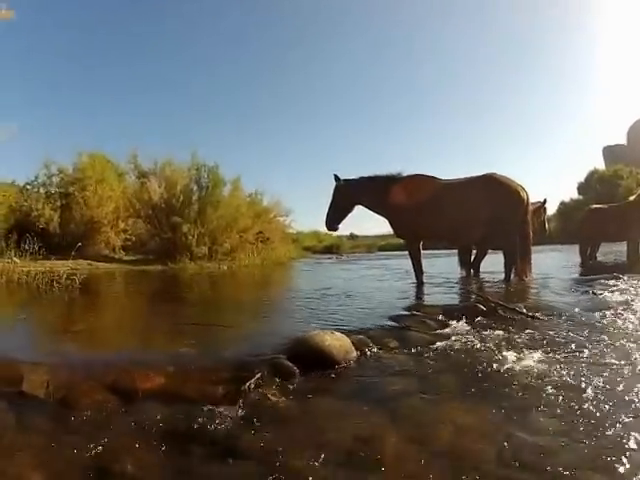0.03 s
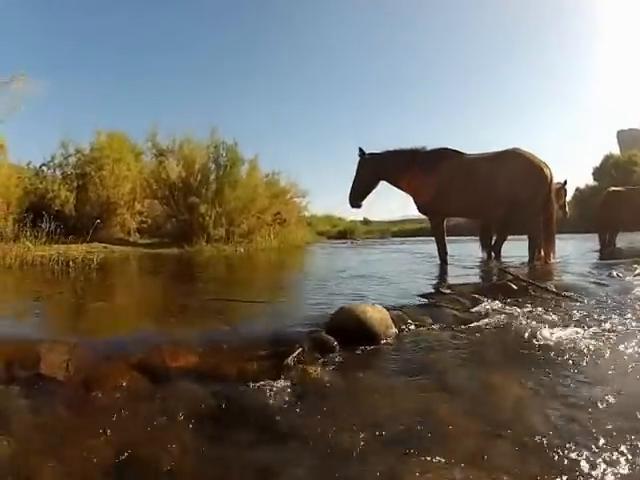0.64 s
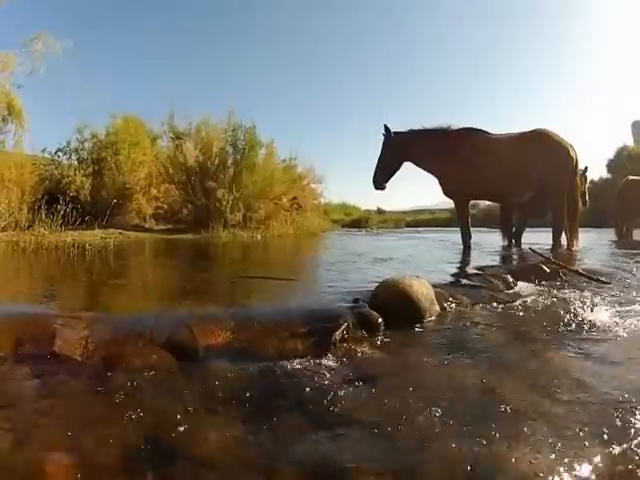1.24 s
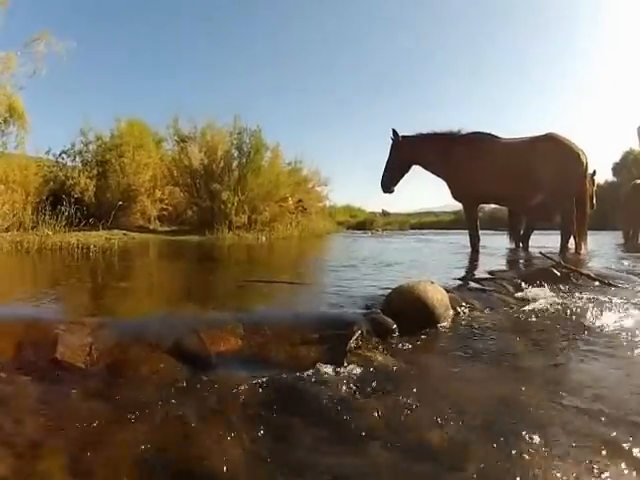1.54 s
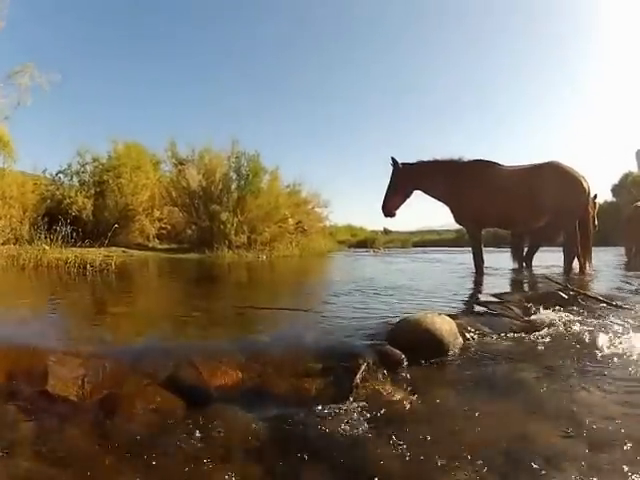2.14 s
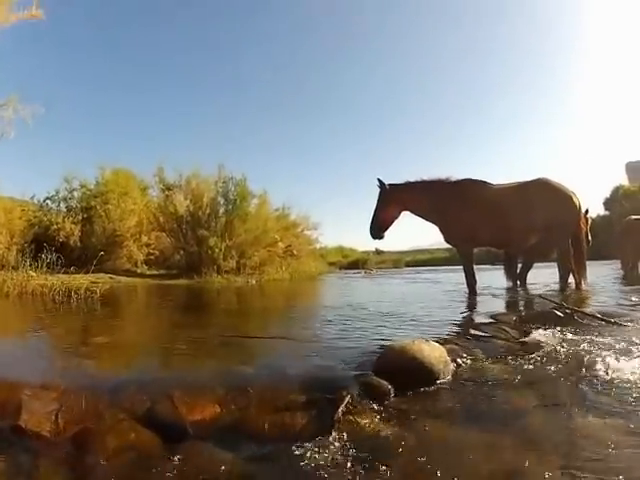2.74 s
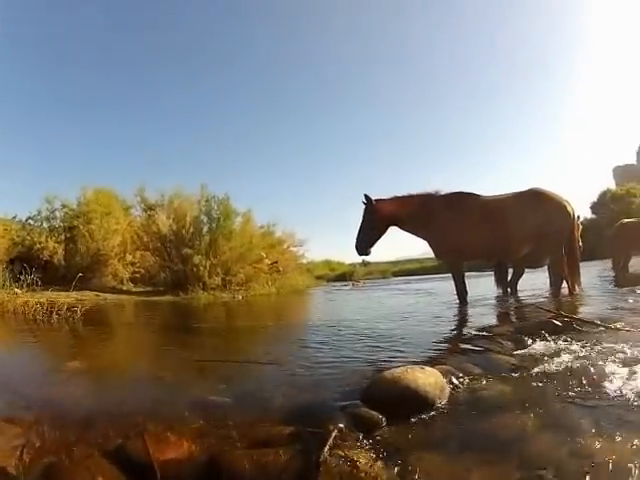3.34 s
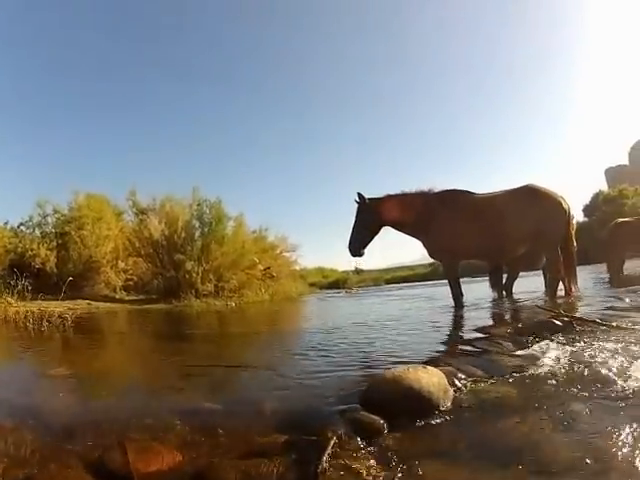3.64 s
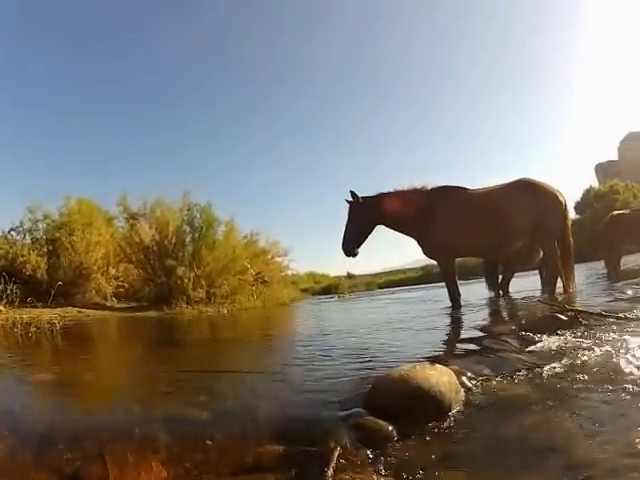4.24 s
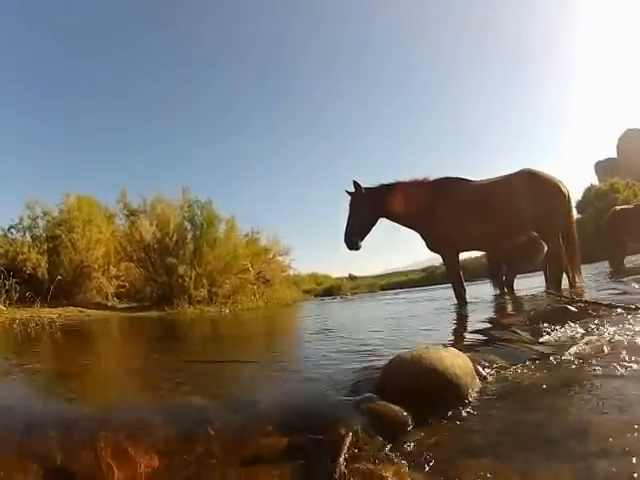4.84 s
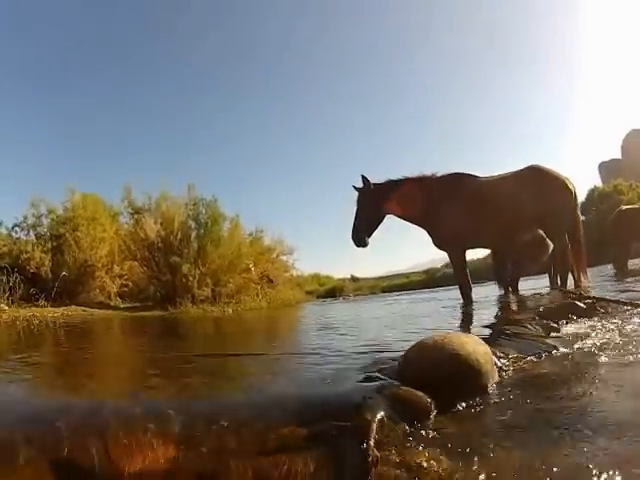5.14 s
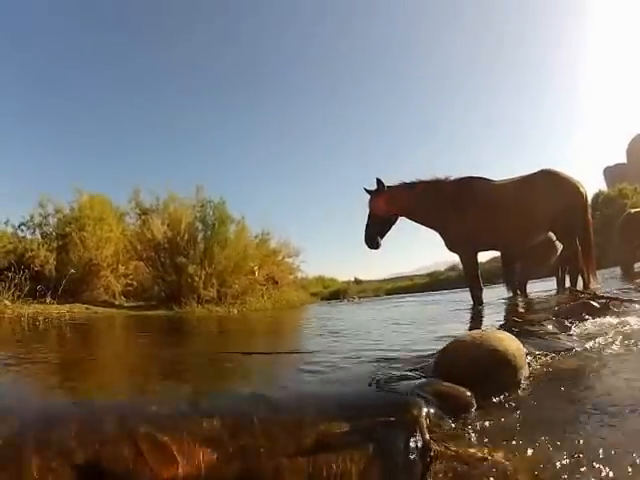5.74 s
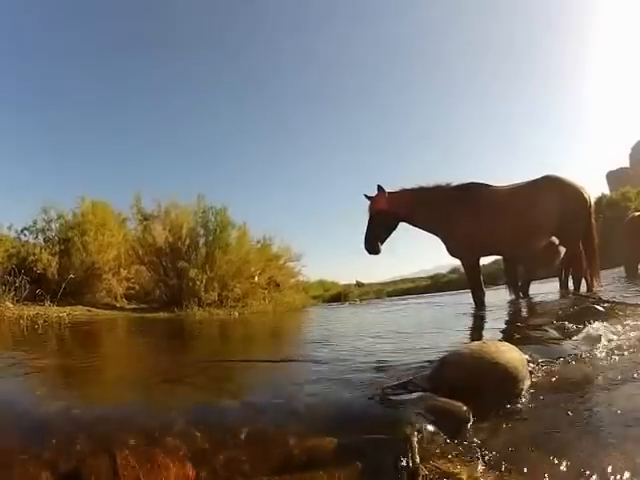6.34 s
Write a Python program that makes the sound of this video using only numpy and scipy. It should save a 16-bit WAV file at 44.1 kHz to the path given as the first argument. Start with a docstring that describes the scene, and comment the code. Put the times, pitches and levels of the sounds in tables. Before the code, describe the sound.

At a shallow river's edge, water laps irregularly against a half-submerged microphone housing, giving hollow thumps, brief splashy washes, plinks and ticking drops. After a short lull past the middle, deep glugs and gurgles lead into gentler lapping. Shallow water trickles faintly over stones throughout. The sound is very close and somewhat muffled by the case, with a thin metallic edge.

```python
"""Wavelets slap a waterproof camera case, half sunk at the edge of a shallow river.
Every push rings the same hollow case modes; water sluices over it and gurgles under it.
Trapped air rings as bubbles, drops tick nearby, and a riffle runs over stones behind.
The camera samples at a low rate and holds each sample, adding a thin metallic sheen."""
import sys
import numpy as np
from scipy import signal
from scipy.fft import rfft, irfft
from scipy.io import wavfile
from scipy.ndimage import uniform_filter1d

SR = 44100
rng = np.random.default_rng(int(sys.argv[2]) if len(sys.argv) > 2 else 0)


def master_out(mix):
    """Clip the mix to full scale and print it as 16-bit PCM to the path in sys.argv[1]."""
    frames = np.transpose(np.atleast_2d(mix))
    ceiling = np.clip(frames, -1, 1)
    pcm = np.round(ceiling * 32767).astype(np.int16)
    wavfile.write(sys.argv[1], SR, pcm)


N = 290178
TIME = np.arange(N) / SR


def undb(db):
    """Decibels to gain."""
    return 10 ** (np.asarray(db) / 20)


def add(track, start_s, sound):
    """Mix a sound into the track at start_s."""
    i = int(np.clip(start_s * SR, 0, N - 1))
    track[i:i + len(sound)] += sound[:N - i]


def through(x, response):
    """Convolve with an impulse response."""
    return signal.fftconvolve(x, response)[:N]


def colour(points, size=4096):
    """Minimum-phase impulse response from (f/Hz, level/dB) points."""
    hz, db = np.transpose(points)
    grid_hz = np.maximum(np.arange(size // 2 + 1) * SR / size, 1)
    gain = undb(np.interp(np.log(grid_hz), np.log(hz), db))
    cepstrum = irfft(np.log(gain))
    cepstrum[1:size // 2] *= 2
    cepstrum[size // 2 + 1:] = 0
    return irfft(np.exp(rfft(cepstrum)))


def wander(rate_hz):
    """Random steps, smoothed twice; unit spread."""
    hold = max(int(SR / rate_hz), 2)
    steps = np.repeat(rng.standard_normal(N // hold + 1), hold)
    smooth = uniform_filter1d(uniform_filter1d(steps, hold), hold)[:N]
    return smooth / smooth.std()


def patter(rate_per_s, spread_db):
    """Tiny impacts at random times, a few much larger; unit rms."""
    size = undb(spread_db * np.minimum(rng.exponential(size=N), 5))
    hits = (rng.random(N) < rate_per_s / SR) * size * rng.choice([-1, 1], N)
    return hits / hits.std()


def surges(table, swell_s=0.016, drain_s=0.019):
    """Envelope of water surges: swell, hold, drain."""
    envelope = np.zeros(N)
    for start_s, length_s, db in table:
        swell = np.clip((TIME - start_s) / swell_s, 0, 1)
        drain = np.exp(-np.maximum(TIME - start_s - length_s, 0) / drain_s)
        envelope += undb(db) * swell * drain
    return envelope


# modes of the half-sunk case: f/Hz, level/dB, t60/s
CASE_MODES = [(38, -24, 0.3), (59, -13.5, 0.12), (119, -23.5, 0.14), (166.8, -13.5, 0.17),
              (229, -21.5, 0.024), (293.6, -20.5, 0.091), (484, -28.5, 0.029), (565, -33, 0.048),
              (612, -20.5, 0.042), (704, -32.5, 0.09), (779, -38.5, 0.13), (836.8, -20, 0.049),
              (977, -33, 0.057), (1094, -27, 0.019), (1440, -23.5, 0.01), (1674, -17.5, 0.0083),
              (2057, -26, 0.0067), (2067, -28.5, 0.02), (2367, -36, 0.058), (3723, -22.5, 0.012),
              (4090, -31.5, 0.038)]


def case(push, band_hz=(33.3, 2570), lag_s=0.00099, lag_corner_hz=260):
    """Every push rings the same modes; the walls cut the deepest sway and the treble."""
    t = TIME[:SR // 2]
    ring = sum(undb(db) * np.exp(-np.log(1000) * t / t60_s) * np.sin(2 * np.pi * hz * t)
               for hz, db, t60_s in CASE_MODES)
    walls = signal.butter(4, band_hz, "band", fs=SR, output="sos")
    ring = signal.sosfilt(walls, ring)
    # low bending waves travel slower and smear the blow
    grid_hz = np.arange(SR // 2 + 1)
    travel_s = lag_s * np.sqrt(1000 / (grid_hz + lag_corner_hz))
    smear = np.exp(-2j * np.pi * np.cumsum(np.maximum(travel_s - lag_s / 2, 0)))
    return through(push, irfft(rfft(ring, SR) * smear))


# water sheets over the case: t/s, length/s, level/dB
SHEETS = [(0, 0.012, -45.5), (.11, 0.027, -59), (0.6, 0.043, -48), (0.85, 0.17, -51.5), (1.052, 0.22, -39),
          (1.185, 0.038, -41), (1.45, 0.15, -37), (2.02, 0.105, -46), (2.235, 0.066, -40),
          (2.41, 0.054, -54)]
# eddy strength: t/s, relative level/dB
EDDY_CURVE = [(0.0, -46), (0.58, -69), (0.84, -31), (1.43, -27.5), (1.7, -36.5), (2.55, -37), (2.69, -38.5),
              (3.28, -40), (3.45, -53), (5.22, -39), (5.44, -47), (6.58, -45)]
# push of churning water: f/Hz, level/dB
CHURN_SPECTRUM = [(30, 19.5), (60, 0.5), (120, 13), (170, -11), (300, -14), (500, -6.5), (1200, -14.5),
                  (4000, -74)]
# push of sluicing water: f/Hz, level/dB
SLUICE_SPECTRUM = [(60, -4), (300, -12), (500, -5), (900, -6), (1700, -1.5), (2500, -1), (3100, 12),
                   (3900, 5), (5500, 11.5)]


def wash(eddy_db=-20, stir_db=-12, trickle_db=-72, flutter_db=2, ripple_db=-7):
    """Eddies buffet the case and flick ripples at it; sheets patter over it and stir more eddies."""
    sheets = surges(SHEETS)
    eddies = undb(eddy_db + np.interp(TIME, *np.transpose(EDDY_CURVE)))
    churn = through(rng.standard_normal(N), colour(CHURN_SPECTRUM))
    churn *= np.hypot(eddies, undb(stir_db) * sheets)
    sluice = through(patter(rate_per_s=3500, spread_db=3.75), colour(SLUICE_SPECTRUM))
    sluice *= np.hypot(sheets, undb(trickle_db))  # a thin film always runs
    ripples = undb(ripple_db) * eddies * patter(rate_per_s=20, spread_db=3.54)
    flutter = undb(flutter_db * wander(rate_hz=60))
    return churn + sluice * flutter + ripples


# riffle heard through the case: f/Hz, level/dB
RIFFLE_SPECTRUM = [(120, 17), (300, 7.5), (600, -0.5), (900, 3.5), (1400, -8.5), (1900, -5.5), (2400, -1),
                   (3300, -8), (5500, -15)]


def riffle(level_db=-54, bubble_db=-4, decay_cycles=8, rise=0.018, spread_db=3, count=4000):
    """Shallow water over stones: small bubbles ring and glide upward over a soft rush."""
    fizz = np.zeros(N)
    for when, pitch, size in rng.random((count, 3)):
        hz = 1000 * 5 ** np.sqrt(pitch)  # 1-5 kHz
        cycles = np.arange(int(5 * decay_cycles * SR / hz)) * hz / SR
        phase = 2 * np.pi * cycles * (1 + rise * cycles / decay_cycles)
        ring = np.exp(-cycles / decay_cycles) * np.sin(phase)
        gain = undb(-spread_db * np.log(max(size, 0.005)))
        add(fizz, when * N / SR, gain * ring)
    water = undb(bubble_db) * fizz / fizz.std() + rng.standard_normal(N)
    water = through(water, colour(RIFFLE_SPECTRUM)) * undb(0.7 * wander(rate_hz=9))
    return water / water.std() * undb(level_db)


# drops landing nearby: t/s, relative level/dB
NEAR_DROPS = [(0.686, -45), (0.712, -39), (0.731, -44), (1.329, -41), (1.525, -37), (1.693, -35),
              (2.303, -29.5), (2.326, -26.5), (2.353, -29), (2.369, -38.5), (2.869, -40), (2.878, -35.5),
              (3.625, -40.5), (3.647, -41.5), (6.532, -45)]
# drop tick heard through the case: f/Hz, level/dB
TICK_SPECTRUM = [(300, -26), (1400, -19.5), (2100, 20.5), (2700, 5), (3300, 12), (4100, -10.5), (5000, 6.5),
                 (5800, 6)]


def drops(near_db=16, far_db=-68):
    """Small drops fall constantly in the riffle; near ones land as single sharp ticks."""
    near = np.zeros(N)
    for start_s, db in NEAR_DROPS:
        add(near, start_s, undb([db + near_db]))
    far = undb(far_db) * patter(rate_per_s=110, spread_db=2.9)
    return through(near + far, colour(TICK_SPECTRUM))


# wavelets on the case: t/s, level/dB, heave re body/dB, knock re body/dB
WAVELETS = [(0.12, -33, 21, 7), (0.674, -14, -12, 9.5), (0.681, 5.5, 1, -14), (1.07, -7.5, 3.5, 12.5),
            (1.076, 4.5, -0.5, -2.5), (1.334, -6, -11, -3.5), (1.385, -4.5, -4.5, -6.5),
            (1.449, -12.5, -13, 1), (1.474, -13.5, -7, 10), (1.498, -14.5, 20.5, 10.5),
            (1.586, -6.5, -11, -10), (1.763, -18.5, 12, 6), (1.902, -19, 8, 19), (1.909, 6.5, -17, -15.5),
            (2.002, -13, 9, 5), (2.009, -3, 7, -0.5), (2.267, 3.5, -10.5, 0), (2.287, 1, 5.5, -11),
            (2.402, -1.5, -7, -6), (2.422, 5.5, -15, -9), (2.534, -12.5, 4.5, -6), (2.585, 3, 1, -3),
            (2.857, 10, -3.5, -4.5), (2.947, -9.5, -2, -12), (3.075, 3, 2.5, -1), (3.172, -8, -2, -8.5),
            (3.235, 0.5, 3, 3), (3.379, -6, 6.5, 6), (3.668, -11.5, -0.5, -10.5), (3.775, -12.5, 4.5, -6.5),
            (4.632, -3.5, -15.5, -24), (4.812, -2, -17, -12.5), (4.845, 0.5, -31, -24.5),
            (4.893, -7, -9, -15.5), (5.016, 0.5, -16, -13), (5.149, -1.5, -34, -9), (5.257, -18, 2, 3),
            (5.377, -4, -17, -9.5), (5.406, -26.5, 11, 16), (5.723, -10.5, -11, -10), (5.762, -7, -5.5, -9),
            (5.967, -30, 6, 13.5), (6.089, -8, -0.5, -1.5), (6.151, -15.5, 3.5, -2.5), (6.237, -29, 3, 10),
            (6.359, -8, 5, -7.5), (6.412, -24.5, 4, 3.5)]
# heave, body, knock and slap bands of a wavelet's push: f/Hz
PUSH_BANDS_HZ = [55, 200, 680, 1800]


def wavelets(crumble_db=-14, crumble_s=0.0025, spatter_db=-11.5, spatter_s=0.01,
             rustle_db=-23, rustle_s=0.0037, spray_cut_hz=420):
    """Firm wavelets push cleanly, weak ones crumble; all rustle before and spatter after."""
    push, spray = np.zeros(N), np.zeros(N)
    t = TIME[:SR // 8]
    spatter = undb(spatter_db) * np.exp(-t / spatter_s) / np.sqrt(spatter_s * SR / 2)
    rustle = undb(rustle_db) * np.exp(-t[:SR // 16] / rustle_s) / np.sqrt(rustle_s * SR / 2)
    for start_s, db, heave_db, knock_db in WAVELETS:
        slap_db = knock_db - 3
        clean_share = 1 / np.sqrt(1 + undb(crumble_db - db - knock_db) ** 2)
        clean_db = 20 * np.log10(clean_share)
        bands_db = [heave_db, 0, knock_db + clean_db, slap_db + clean_db]
        add(push, start_s, undb(db) * colour(np.c_[PUSH_BANDS_HZ, bands_db]))
        crumble = np.sqrt(1 - clean_share ** 2) * np.exp(-t / crumble_s) / np.sqrt(crumble_s * SR / 2)
        envelope = np.r_[rustle[::-1], crumble + spatter]
        impact = colour(np.c_[PUSH_BANDS_HZ[2:], [knock_db, slap_db]])
        burst = signal.fftconvolve(envelope * rng.standard_normal(len(envelope)), impact)
        add(spray, start_s - len(rustle) / SR, undb(db) * burst)
    # spray is too light to move the deep modes
    low_cut = signal.butter(2, spray_cut_hz, "high", fs=SR, output="sos")
    return push + signal.sosfilt(low_cut, spray)


# trapped air, deep glugs to small plinks: t/s, f/Hz, level/dB
BUBBLES = [(0.561, 3300, -44.5), (0.676, 1955, -21.5), (0.766, 1880, -33.5), (0.817, 1845, -40),
           (1.076, 847, -18), (1.207, 110, -19.5), (1.499, 559, -18.5), (1.586, 120, -8),
           (1.909, 598, -11.5), (2.857, 535, -12.5), (2.857, 2010, -17.5), (4.73, 2190, -34),
           (4.809, 120, -17.5), (4.843, 264, -25.5), (4.851, 3480, -40), (5.017, 122, -21.5),
           (5.148, 132.4, -14.5), (5.258, 1570, -28), (5.375, 119.6, -21), (5.724, 241, -28),
           (6.089, 120, -25), (6.157, 124, -19)]


def bubbles(cycles_at_1khz=44.4, rise=0.018):
    """Each air pocket swells within a cycle, rings and rises slightly; large ones ring longest."""
    track = np.zeros(N)
    t = TIME[:SR // 3]
    for start_s, hz, db in BUBBLES:
        t60_s = cycles_at_1khz * (hz / 1000) ** 0.3 / hz
        envelope = (1 - np.exp(-2 * hz * t)) * np.exp(-np.log(1000) * t / t60_s)
        phase = 2 * np.pi * hz * t * (1 + rise * t / t60_s)
        add(track, start_s, undb(db) * envelope * np.sin(phase))
    return track


# gurgles under the case: t/s, length/s, level/dB
GURGLES = [(0.74, 0.13, -42), (4.46, 0.072, -42.5), (4.57, 0.095, -38.5), (4.82, 0.044, -37),
           (4.97, 0.042, -34.5), (5.15, 0.03, -35), (6.16, 0.015, -36)]
# push of a gurgle: f/Hz, level/dB
GURGLE_SPECTRUM = [(60, -7.5), (160, -0.5), (300, -2.5), (700, -15), (1500, -20), (4000, -29)]


def gurgles():
    """Water creeping under the case nudges it with quick runs of soft pushes."""
    nudges = patter(rate_per_s=900, spread_db=2) * surges(GURGLES)
    return through(nudges, colour(GURGLE_SPECTRUM))


def scene():
    """Water on the case, bubbles and drops beside it, riffle behind; mono."""
    push = wavelets() + wash() + gurgles()
    return (case(push) + bubbles() + drops() + riffle())[None]


def record(dry, rumble_hz=33, sample_hz=12000, alias_cut_hz=5680, top_hz=15200):
    """The deepest rumble is cut; sample-and-hold mirrors the sound faintly into the treble."""
    rumble_cut = signal.butter(2, rumble_hz, "high", fs=SR, output="sos")
    alias_cut = signal.butter(3, alias_cut_hz, fs=sample_hz, output="sos")
    top_cut = signal.ellip(8, 0.2, 70, top_hz, fs=SR, output="sos")
    heard = signal.sosfilt(rumble_cut, dry)
    sampled = signal.resample_poly(heard, sample_hz, SR, axis=1)
    sampled = signal.sosfilt(alias_cut, sampled)
    held = np.repeat(sampled, 4, axis=1)
    held = signal.resample_poly(held, SR, 4 * sample_hz, axis=1)[:, :N]
    return signal.sosfilt(top_cut, held)


dry = scene()
out = record(dry)
master_out(out)
```